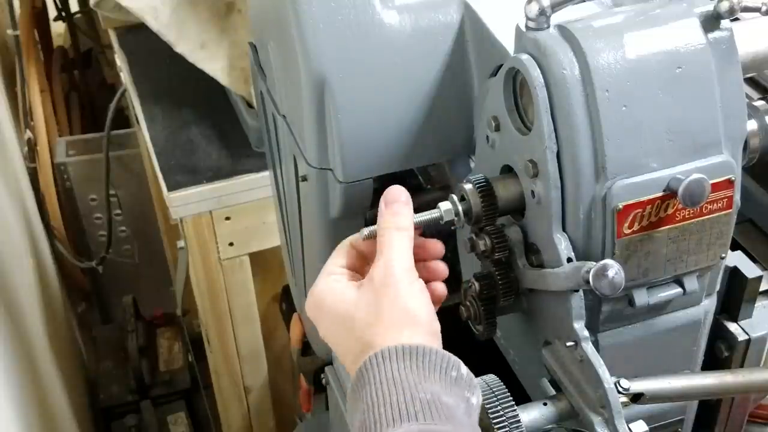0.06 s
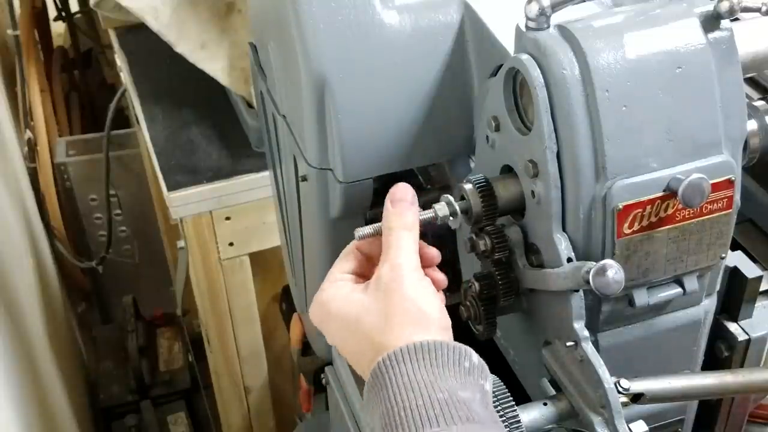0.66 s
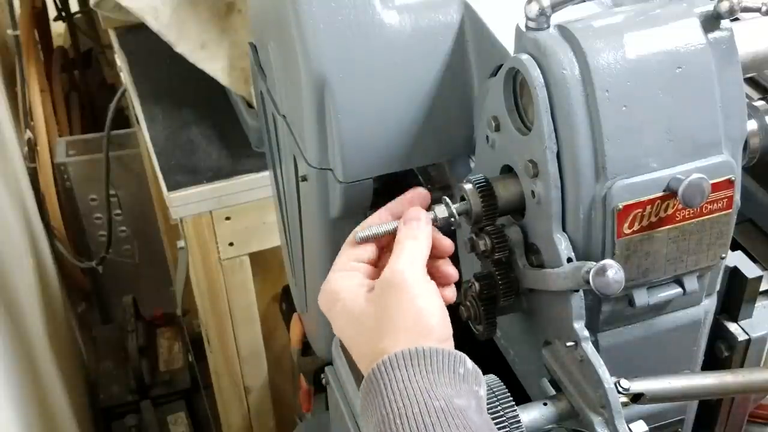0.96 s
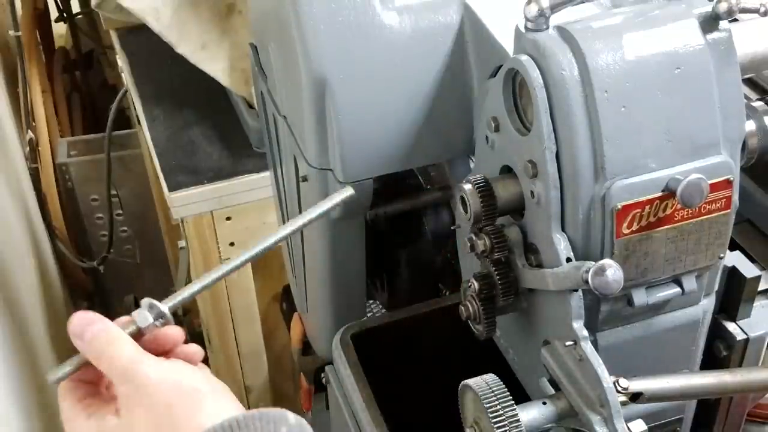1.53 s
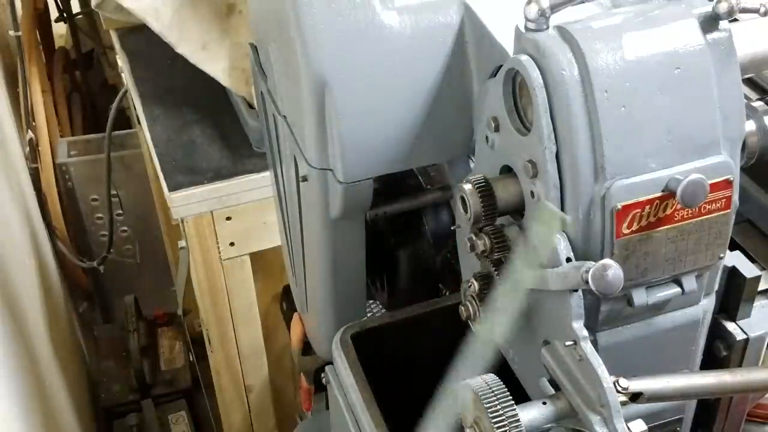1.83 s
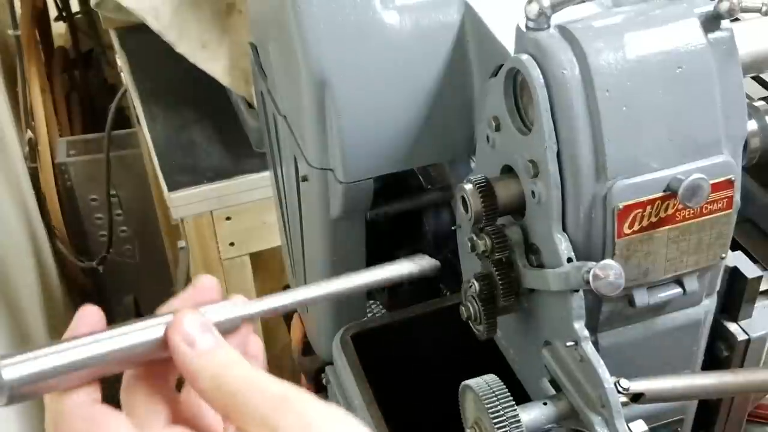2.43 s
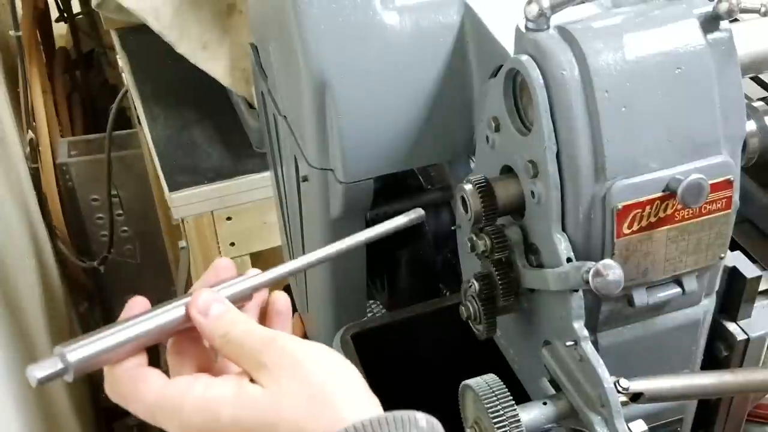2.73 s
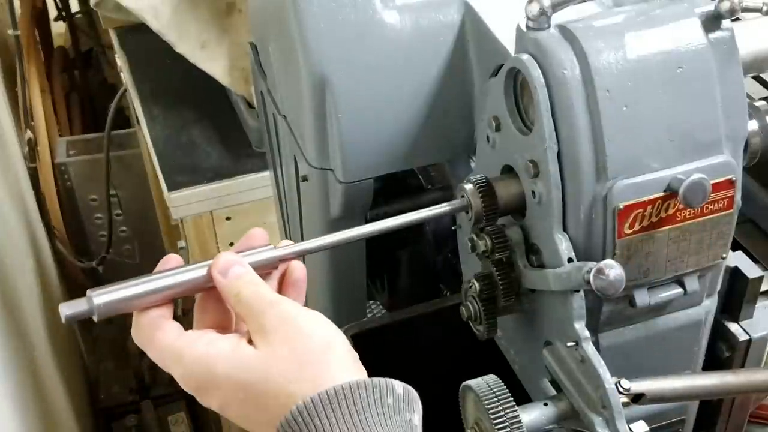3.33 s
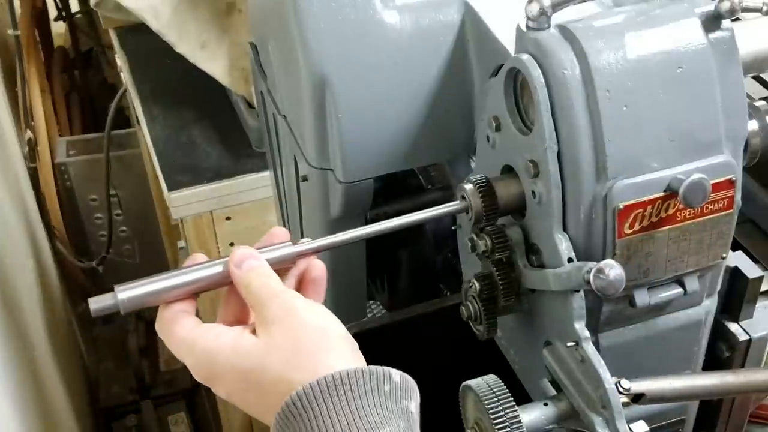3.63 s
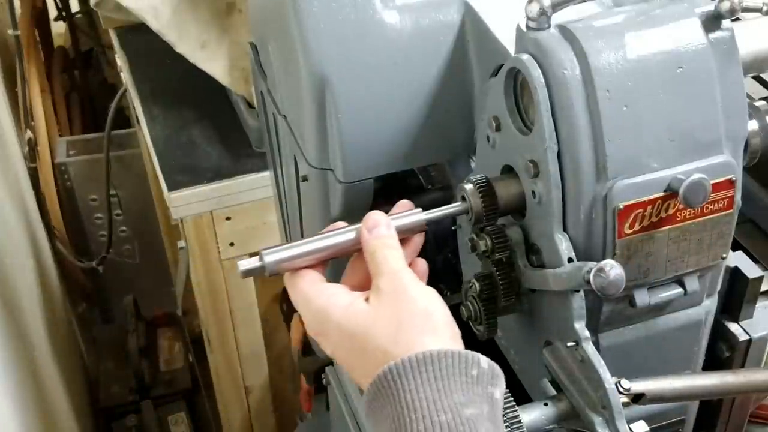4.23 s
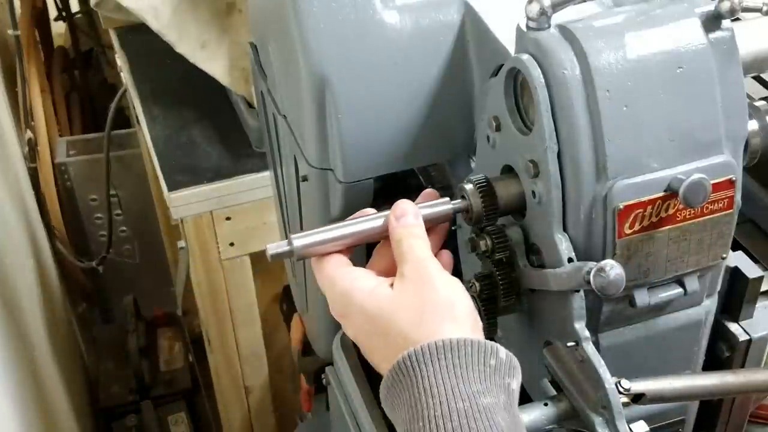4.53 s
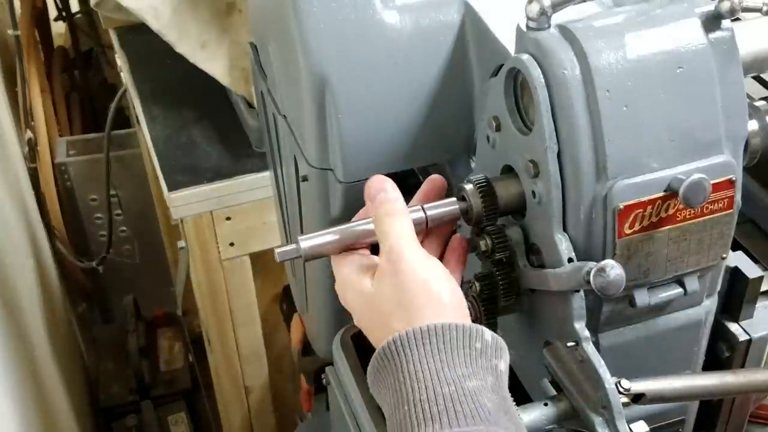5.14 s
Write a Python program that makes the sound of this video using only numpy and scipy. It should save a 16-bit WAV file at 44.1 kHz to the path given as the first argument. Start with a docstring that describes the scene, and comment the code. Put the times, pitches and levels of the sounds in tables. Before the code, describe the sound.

From the start, a threaded steel bar is drawn out of a lathe spindle in short, uneven rasps, each ringing the bar and the cast housing, with a soft hollow boom from the cover. The scrapes are strongest around 0.8 to 1.1 seconds, where the bar briefly squeaks, and stop by 1.4 seconds. A faint, thin ping follows at 1.7 seconds. Soft hand and sleeve brushes come between 1.9 and 2.4 seconds, then a quick run of dry ticks around 2.5. After a pause, a steel rod strikes the bore at 3.2 seconds and works inward with irregular bright clinks, a faint high ring and swells of grinding. The loudest, fuller knocks land around 4.7 seconds, with a last double knock at 5. Everything sounds close, with short reflections of a small workshop, still air and a faint electrical hum.

```python
"""A small workshop: a threaded drawbar is pulled from a lathe spindle, then a steel rod knocks home.
The drawbar rasps over the rim of the bore, squeaks as it sticks and pings once it is free. After soft
hand brushes and a run of dry ticks, the rod clinks and grinds its way in. Each drag and knock rings
the bar itself and the cast headstock, whose hollow cover booms a moment later.
Short room reflections, still air and a faint mains hum sit underneath."""
import sys
import numpy as np
from scipy import signal
from scipy.fft import irfft
from scipy.io import wavfile
from scipy.ndimage import uniform_filter1d

SR = 44100
rng = np.random.default_rng(int(sys.argv[2]) if len(sys.argv) > 2 else 0)


def to_wav(sig):
    """Store sig (one row per channel, or 1-D mono) as 16-bit WAV at the path in sys.argv[1].

    Samples outside -1..1 are clipped; the rate is SR.
    """
    pcm = np.clip(np.atleast_2d(sig), -1, 1) * 32767
    pcm = np.round(pcm).astype(np.int16)
    wavfile.write(sys.argv[1], SR, pcm.T)  # frames by channels


N = 228790
RING_SIZE, STROKE_SIZE = 30000, 4096  # samples in a long ring and in a short contact
TIME, AGE = np.arange(N) / SR, np.arange(RING_SIZE) / SR  # seconds into the scene, and into a ring

# room tone, the spectrum of still air: frequency_hz, relative_db
AIR_SPECTRUM = [(15, -35.5), (25, 4), (59, -20), (86, -6.5), (119, -4.5), (253, -6.5), (331, -3),
                (399, -13.5), (482, -9.5), (648, -12), (3260, -22.5), (10600, -32), (11500, -30.5),
                (15500, -35.5)]
# mains hum: pitch_hz, level_db
HUM_TONES = [(59.5, -81.5), (119.5, -80.5)]
# the workshop's reverb tail: frequency_hz, t60_s
ROOM_DECAY = [(150, 1), (400, 0.85), (1000, 0.35), (2800, 0.29), (7000, 0.27), (14000, 0.18)]
# the drawbar drags over the rim: start_s, force_db, hardness_db_per_octave
DRAGS = [(0.022, -48.5, -6), (0.161, -48, -4), (0.245, -60, -7.5), (0.345, -59, -14), (0.379, -46.5, -1.5),
         (0.505, -57.5, -6), (0.547, -54, -1.5), (0.676, -52, -3.5), (0.821, -40.5, -1),
         (0.869, -37.5, -2.5), (0.99, -55, -12), (1.034, -39.5, -2), (1.078, -38, 0), (1.103, -45, -5),
         (1.149, -48.5, -8.5), (1.2, -45, -8), (1.275, -45, -4.5), (1.315, -46, -8), (1.366, -50.5, 0.5)]
# the crowd of short-lived modes in the casting: frequency_hz, relative_db
CRACK_SPECTRUM = [(80, -58), (300, -8), (750, -13.5), (1000, 3), (1450, -0.5), (2000, -6), (2450, 1.5),
                  (3300, -6), (4800, -22), (8000, -31), (11000, -36), (15500, -34.5)]
# the lasting ring of headstock and spindle: pitch_hz, relative_db, t60_s
HEADSTOCK_MODES = [(553, -13, .3), (835, -17, .25), (992, 0, .27), (1030, -2, .18), (1106, -3, .3),
                   (1168, -3, .2), (1236, 1, .22), (1280, -3, .15), (1366, 0, .2), (1405, -3, .25),
                   (1462, 1, .2), (1518, -5, .22), (1683, -2, .24), (1783, -3, .26), (1900, -8, .2),
                   (2050, -12, .18), (2285, -7, .2), (2415, -7, .18), (2478, -3, .2), (2660, -10, .17),
                   (2820, -12, .13), (2975, -9, .14), (3125, -13, .16)]
# the drawbar's bright ring: pitch_hz, relative_db, t60_s
DRAWBAR_MODES = [(3240, -3, 0.077), (3815, 3.5, 0.037), (5630, 4, 0.017), (6060, -26, 0.0087),
                 (8130, 4, 0.035), (8240, 1.5, 0.022), (10200, -27, .06), (11100, -0.5, 0.054),
                 (10170, -48, 0.057), (15100, -14.5, 0.064)]
# the hollow cover's boom: pitch_hz, relative_db, t60_s
COVER_MODES = [(120, -14, .5), (168, -8, .25), (195, -12, .15), (222, -7, .3), (250, -10, .18),
               (290, -9, .14), (332, 2, .25), (350, -3, .15), (395, -8, .14), (465, -10, .17)]
# the dull thud of the cover's walls: frequency_hz, relative_db
THUD_SPECTRUM = [(50, -28), (110, -4), (170, 1.5), (230, 3), (330, -5.5), (450, 2), (650, -3), (1200, -49),
                 (3000, -80)]
# the drawbar sticks under the hardest pull: start_s, level_db
SQUEAK_CUES = [(1.055, -47.5), (1.090, -47.5)]
# the partials of a squeak: pitch_hz
SQUEAK_PITCHES = [3260, 5540]
# the freed drawbar rings in the hand: start_s, level_db
PING_CUES = [(1.688, -66)]
# hand and sleeve brush or bump the steel: start_s, level_db, centre_hz, length_s
BRUSH_CUES = [(1.903, -61, 810, 0.049), (2.02, -60.5, 573, 0.044), (2.063, -52, 530, 0.032),
              (2.1, -65, 1250, 0.077), (2.325, -57, 500, .025), (2.346, -56, 1490, 0.016)]
# dry ticks as the rod is picked up: start_s
TICK_CUES = [2.427, 2.448, 2.4765, 2.494, 2.5175, 2.5355, 2.5503, 2.5703]
# the tiny ring of a tick: pitch_hz, relative_db, t60_s
TICK_PARTIALS = [(1990, 2.5, 0.0022), (6930, -9.5, 0.0067), (3750, -9, .0008)]
# the rod strikes the bore: start_s, force_db, hardness_db_per_octave, relative_ring_db
BLOWS = [(3.2165, -39, -5, -5), (3.316, -49.5, -12, -14.5), (3.3617, -36, -2, -6.5),
         (3.3652, -43, -9, -3.5), (3.4238, -48, -4.5, -7.5), (3.4613, -42, -3.5, -9),
         (3.5401, -51.5, -43, -31), (3.584, -49, -10, -11.5), (3.686, -43.5, -2, -22.5),
         (3.7126, -53.5, -0.5, -34), (3.785, -50.5, -4.5, -2.5), (3.8298, -45.5, -6.5, -13.5),
         (3.928, -55.5, -11, -17), (3.985, -46.5, -4, -18), (4.006, -50, -9, -27), (4.0578, -50, 0, -16),
         (4.086, -45, -4.5, -20), (4.102, -42.5, 0, -21), (4.1159, -44, -3, -13), (4.205, -46, -6.5, -11.5),
         (4.251, -50, -2.5, -16), (4.3657, -44, -5.5, -12.5), (4.393, -43, -4, -10), (4.42, -61, -11, -3),
         (4.4467, -39.5, -14.5, -16.5), (4.4643, -37, -7.5, -21), (4.65, -55.5, -45, -19),
         (4.6779, -31.5, -5, -17), (4.6947, -34.5, -7, -10), (4.7099, -36, -1.5, -5.5),
         (5.0355, -37, -7.5, -22), (5.0429, -38.5, -6, -24)]
# the rod's clink, damped by the fingers: pitch_hz, relative_db, t60_s
ROD_MODES = [(4050, 1, 0.046), (4460, -10.5, 0.062), (5010, -2.5, 0.017), (5540, -10.5, 0.036),
             (6210, -9, 0.034), (6940, -0.5, 0.074), (6960, 6, 0.015), (7390, -2, 0.019), (8060, -9, 0.013),
             (8560, 2, 0.019), (9150, -0.5, 0.05), (10060, -17, 0.034), (12320, -2.5, 0.062),
             (13000, -22, .02)]
# one barely damped mode of the rod sings on: start_s, level_db, length_s
SING_CUES = [(3.217, -61, 0.14), (3.365, -78, 0.29), (3.786, -79, 0.28), (4.115, -71.5, 0.63)]
# the hand pushes the rod along the bore: peak_s, level_db
PUSH_CUES = [(3.495, -50.5), (3.89, -61), (4.126, -44.5), (4.27, -49.5), (4.42, -42), (4.691, -50),
             (4.84, -58.5)]


def amp(db):
    """Decibels to gain."""
    return 10 ** (np.asarray(db) / 20)


def unit_rms(x, size=None):
    """Scales to rms 1 over the first size samples, or over all."""
    return x / np.sqrt(np.mean(x[:size] ** 2) + 1e-20)


def curve_at(points, hz):
    """Reads a curve on a logarithmic frequency axis."""
    point_hz, value = np.transpose(points)
    return np.interp(np.log(hz + 1), np.log(point_hz), value)


def add(mix, start_s, sound):
    """Drops a sound into the mix at its cue."""
    part = mix[max(round(start_s * SR), 0):][:len(sound)]
    part += sound[:len(part)]


def noise(spectrum, size, slope_db=0):
    """Shaped noise of rms 1, tilted by slope_db per octave between 1 and 5 kHz."""
    hz = np.fft.rfftfreq(size, 1 / SR)
    gain = amp(curve_at(spectrum, hz) + slope_db * np.log2(np.clip(hz, 1000, 5000)))
    return unit_rms(irfft(gain * np.exp(2j * np.pi * rng.random(len(hz))), size))


def onset(rise_s):
    """A smooth attack."""
    return 1 - np.exp(-(AGE / rise_s) ** 2)


def fade(t, t60_s):
    """A decay of 60 dB in t60_s."""
    return np.exp(-np.log(1000) * t / np.maximum(t60_s, 1e-4))


def swell(length_s):
    """A contact that rises and falls smoothly."""
    return np.sin(np.pi * np.minimum(AGE[:STROKE_SIZE] / length_s, 1)) ** 2


def room_tone():
    """Steady workshop air with a trace of mains hum."""
    hum = sum(amp(db) * np.sqrt(2) * np.sin(2 * np.pi * (hz * TIME + rng.random()))
              for hz, db in HUM_TONES)
    return amp(-69.5) * noise(AIR_SPECTRUM, N) + hum


def grit(size, per_s, spread_db):
    """Tiny slips of steel on steel, of uneven size."""
    slips = rng.random(size) < per_s / SR
    return slips * rng.standard_normal(size) * amp(spread_db * np.minimum(rng.exponential(1, size), 4))


def driven(force, response):
    """A contact force drives a body; the result has the energy of 20 ms at rms 1."""
    sound = signal.fftconvolve(force, response)
    return sound * np.sqrt(0.02 * SR) / np.linalg.norm(sound)


def resonator(modes, scatter_db):
    """Returns a function that rings a body; each contact point weights its modes differently."""
    hz, db, t60_s = np.transpose(modes)
    waves = fade(AGE, t60_s[:, None]) * np.exp(2j * np.pi * hz[:, None] * AGE)
    octaves = np.log2(np.maximum(hz, 1000))

    def ring(slope_db=0):
        """One ring, tilted by slope_db per octave above 1 kHz."""
        weights = amp(db + slope_db * octaves + scatter_db * rng.standard_normal(len(hz)))
        phases = np.exp(2j * np.pi * rng.random(len(hz)))
        return unit_rms(((weights * phases) @ waves).real, size=900)
    return ring


def casting_crack(headstock, hardness, t60_s, modes_db):
    """A short crack of dense modes over the headstock's lasting ring; harder contact is brighter."""
    crack = unit_rms(noise(CRACK_SPECTRUM, RING_SIZE, hardness) * fade(AGE, t60_s), size=900)
    return (crack + amp(modes_db) * headstock(hardness / 2)) * onset(rise_s=0.0002)


def contact_colour(x, hz, band_db):
    """Mixes in the broad band where this kind of contact resonates."""
    return x + amp(band_db) * signal.lfilter(*signal.iirpeak(hz, Q=2.9, fs=SR), x)


def bar_ring(modes, slope_db, detune):
    """Steel rings briefly, tilted by slope_db per octave; each contact stiffens it and shifts its modes."""
    hz, db, t60_s = np.transpose(modes)[:, :, None]
    t = AGE[:STROKE_SIZE]
    shift = 1 + detune * rng.standard_normal(hz.shape)
    waves = np.sin(2 * np.pi * (hz * shift * t + rng.random(hz.shape))) * fade(t, t60_s)
    return (amp(db + slope_db * np.log2(hz)) * waves).sum(0) * onset(rise_s=0.00005)[:STROKE_SIZE]


def cover_boom(cover, rise_s):
    """The hollow cover thuds, and the air in it takes a few cycles to swell."""
    thud = unit_rms(noise(THUD_SPECTRUM, RING_SIZE) * fade(AGE, 0.16), size=900)
    return (cover() + amp(2) * thud) * onset(rise_s)


def drawbar_rasps(headstock, cover):
    """Each drag is a short swell of slips into casting and bar, inside a longer, lighter graze."""
    ordinary_force_db = -46.5
    clear_s, clear_db_per_s = 1.276, 250  # leaving the bore, the bar stops shaking the cover
    out = np.zeros(N)
    for start_s, force_db, hardness in DRAGS:
        drag = grit(STROKE_SIZE, per_s=20000, spread_db=1) * swell(length_s=0.035)
        graze = grit(STROKE_SIZE, per_s=2500, spread_db=7) * swell(length_s=0.09)
        crack = casting_crack(headstock, hardness, t60_s=0.06, modes_db=-14.5)
        ring = bar_ring(DRAWBAR_MODES, slope_db=0.5, detune=0.0028)
        shimmer = bar_ring(DRAWBAR_MODES, slope_db=5, detune=0.0095)
        boom_db = -52.5 + 0.59 * (force_db - ordinary_force_db)  # grows more slowly than the force
        boom_db -= clear_db_per_s * max(start_s - clear_s, 0)
        add(out, start_s, amp(force_db) * driven(drag, contact_colour(crack, hz=1645, band_db=0)))
        add(out, start_s, amp(force_db - 18) * driven(drag, ring))
        add(out, start_s - 0.03, amp(force_db - 27) * driven(graze, shimmer))  # just before it catches
        add(out, start_s, amp(boom_db) * cover_boom(cover, rise_s=0.031))
    return out


def drawbar_squeaks():
    """The drawbar sticks and squeaks on its lower modes, with a jitter in the pitch."""
    out = np.zeros(N)
    for start_s, db in SQUEAK_CUES:
        jitter = 1 + 0.017 * unit_rms(uniform_filter1d(rng.standard_normal(STROKE_SIZE), size=120))
        squeak = sum(np.sin(2 * np.pi * hz * np.cumsum(jitter) / SR) for hz in SQUEAK_PITCHES)
        add(out, start_s, amp(db) * squeak * swell(length_s=0.029))
    return out


def drawbar_ping(pitch_hz=11400):
    """The freed drawbar rings once in the hand, thin and high."""
    out = np.zeros(N)
    ping = np.sin(2 * np.pi * pitch_hz * AGE[:STROKE_SIZE]) * swell(length_s=0.063)
    for start_s, db in PING_CUES:
        add(out, start_s, amp(db) * ping)
    return out


def hand_brushes():
    """Hand and sleeve brush the steel: soft puffs of noise with a hiss on top."""
    out = np.zeros(N)
    for start_s, db, hz, length_s in BRUSH_CUES:
        size = round(length_s * SR)
        hiss_db = -72.5 - db  # skin and cloth hiss alike in every touch
        spectrum = [(hz / 4, -16), (hz, 0), (hz * 2.05, hiss_db),
                    (hz * 9, hiss_db - 16.5), (hz * 25, hiss_db - 27)]
        add(out, start_s, amp(db) * noise(spectrum, size) * signal.windows.hann(size))
    return out


def pickup_ticks():
    """Small dry ticks as the rod is picked up, each dying within milliseconds."""
    out = np.zeros(N)
    tick = sum(amp(db) * fade(AGE, t60_s) * np.sin(2 * np.pi * hz * AGE)
               for hz, db, t60_s in TICK_PARTIALS)
    for start_s in TICK_CUES:
        add(out, start_s, amp(-46.5) * tick)
    return out


def rod_knocks(headstock, cover):
    """The rod strikes the bore and chatters briefly, ringing casting, rod and cover."""
    midway_s, shank_enters_s, seated_s = 3.98, 4.44, 4.9
    square_t60_s, glancing_t60_s = 0.0094, 0.039
    ordinary_ring_db = -5.5
    out = np.zeros(N)
    for start_s, force_db, hardness, ring_db in BLOWS:
        # square hits at the mouth and the seat; midway the rod glances and chatters longer
        glancing = np.exp(-((start_s - midway_s) / 0.83) ** 2)
        chatter = fade(AGE[:STROKE_SIZE], square_t60_s + (glancing_t60_s - square_t60_s) * glancing)
        force = amp(-11) * grit(STROKE_SIZE, per_s=11000, spread_db=-1) * chatter
        force[0] = 1  # the blow itself
        crack = casting_crack(headstock, hardness, t60_s=0.07, modes_db=-7.5)
        slope_db = -1.5 + 0.43 * (ring_db - ordinary_ring_db)  # a freer rod rings brighter
        if start_s < shank_enters_s:  # the thin tip
            body = contact_colour(crack, hz=2430, band_db=-5)
        else:  # the thick shank: a lower knock, a brighter ring
            body = contact_colour(crack, hz=1470, band_db=2)
            slope_db += 3.5
        clink = bar_ring(ROD_MODES, slope_db, detune=0.0042)
        boom_db = -8 if start_s < seated_s else -11  # once home, the rod shakes the cover less
        add(out, start_s, amp(force_db) * driven(force, body))
        add(out, start_s, amp(force_db + ring_db) * driven(force, clink))
        add(out, start_s, amp(force_db + boom_db) * cover_boom(cover, rise_s=0.034))
    return out


def rod_singing(pitch_hz=8463):
    """One barely damped mode of the rod sings on until a touch chokes it."""
    out = np.zeros(N)
    tone = np.sin(2 * np.pi * pitch_hz * AGE) * onset(rise_s=0.00089) * fade(AGE, t60_s=1)
    for start_s, db, length_s in SING_CUES:
        choke = np.clip((length_s - AGE) / 0.016, 0, 1)
        add(out, start_s, amp(db) * tone * choke)
    return out


def rod_slide(headstock):
    """The rod grinds along the bore, swelling and easing with each push, with a thin rasp midway."""
    rise_db_per_s, fall_db_per_s = 270, 146
    pushes_db = [db - np.maximum(rise_db_per_s * (peak_s - TIME), fall_db_per_s * (TIME - peak_s))
                 for peak_s, db in PUSH_CUES]
    force = grit(N, per_s=5100, spread_db=2)
    cracks = [casting_crack(headstock, hardness, t60_s=0.02, modes_db=-63) for hardness in (-4.5, -11)]
    sharp, dull = (unit_rms(signal.fftconvolve(force, crack)[:N]) for crack in cracks)
    buried = np.clip((TIME - 4.38) / 0.11, 0, 1)  # deep in the bore the grind loses its edge
    grind = ((1 - buried) * sharp + buried * dull) * amp(np.max(pushes_db, axis=0))
    rasp = noise([(2000, -71), (4100, -16), (4450, 9), (4750, -9), (7000, -62)], N)
    rasp_swell = np.exp(-((TIME - 4.28) / 0.069) ** 2)
    return grind + amp(-67) * rasp * rasp_swell


def workshop_reverb(x):
    """Dense reflections build up quickly, each band dying at its own speed."""
    hz, t, bands = signal.stft(rng.standard_normal(SR), SR, nperseg=256)
    bands = bands * fade(t, curve_at(ROOM_DECAY, hz)[:, None])
    tail = signal.istft(bands, SR, nperseg=256)[1][:RING_SIZE] * onset(rise_s=0.0051)
    return signal.fftconvolve(x, tail / np.linalg.norm(tail))[:N]


def scene():
    """The mono mix: bars, machine and hands feed the reverb; ticks and room tone stay dry."""
    headstock, cover = resonator(HEADSTOCK_MODES, scatter_db=4), resonator(COVER_MODES, scatter_db=2)
    brushes = hand_brushes()
    drawbar = drawbar_rasps(headstock, cover) + drawbar_squeaks() + drawbar_ping()
    rod = rod_knocks(headstock, cover) + rod_singing() + rod_slide(headstock)
    close = drawbar + brushes + rod
    return (close + amp(-11) * workshop_reverb(close) + pickup_ticks() + room_tone())[None]


def record(dry):
    """The microphone rolls off the deep bass; a steep low-pass trims the top."""
    low_cut_hz, high_cut_hz = 48, 15850
    thinned = signal.sosfilt(signal.butter(2, low_cut_hz, "high", fs=SR, output="sos"), dry)
    low_pass = signal.firwin(511, high_cut_hz, window=("kaiser", 9), fs=SR)
    return signal.oaconvolve(thinned, low_pass[None], "same")


dry = scene()
out = record(dry)
to_wav(out)
```